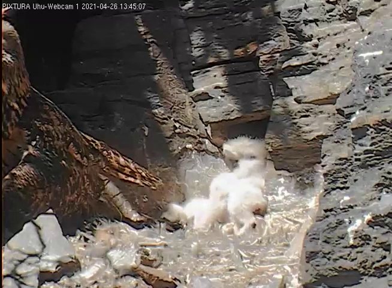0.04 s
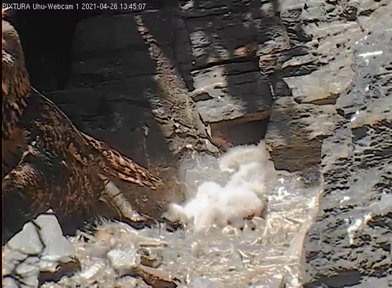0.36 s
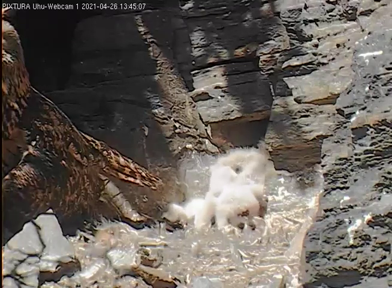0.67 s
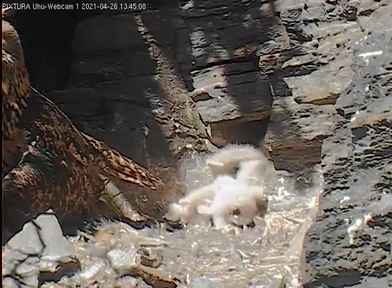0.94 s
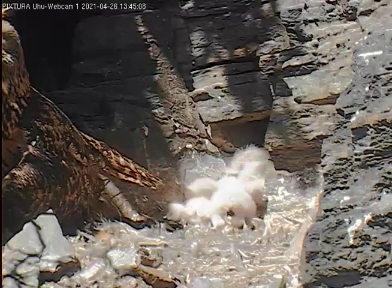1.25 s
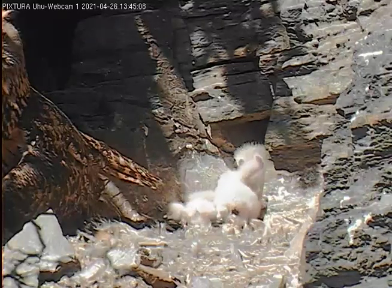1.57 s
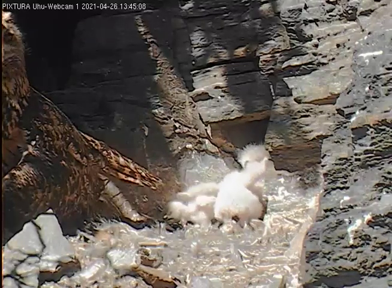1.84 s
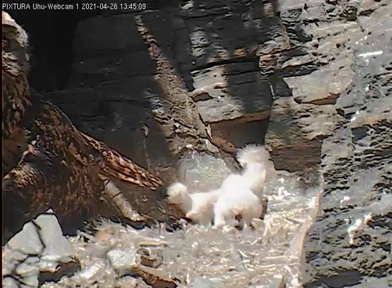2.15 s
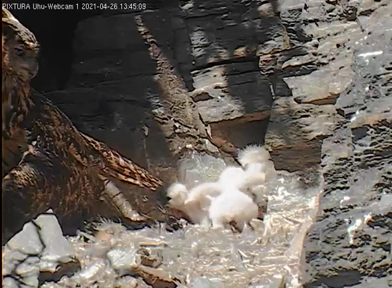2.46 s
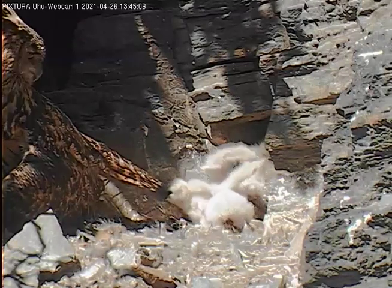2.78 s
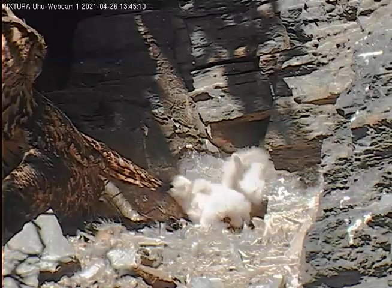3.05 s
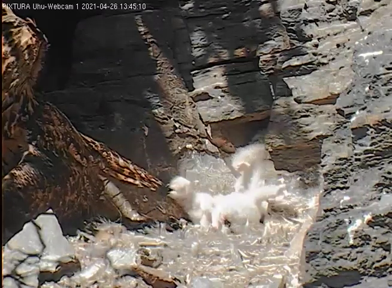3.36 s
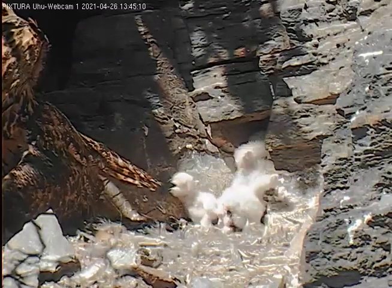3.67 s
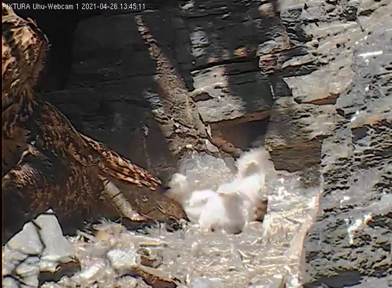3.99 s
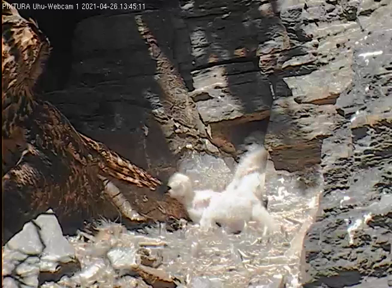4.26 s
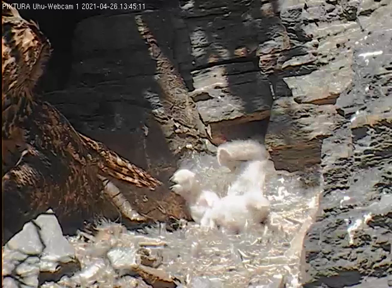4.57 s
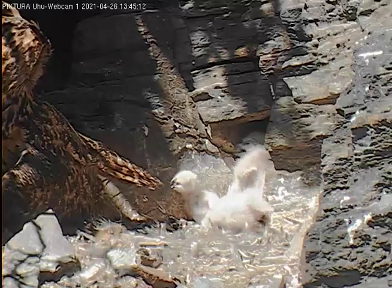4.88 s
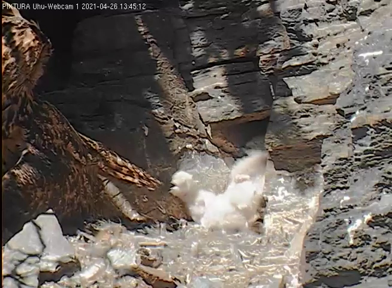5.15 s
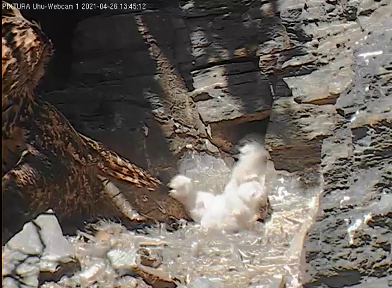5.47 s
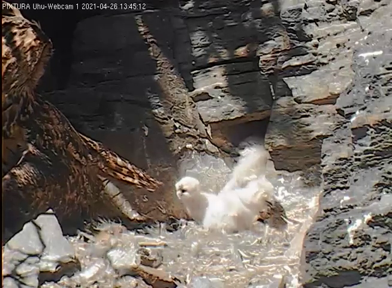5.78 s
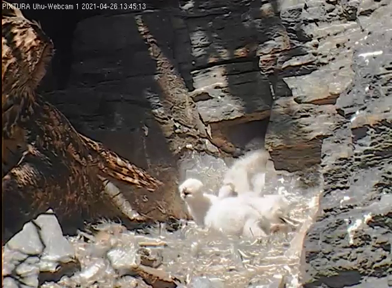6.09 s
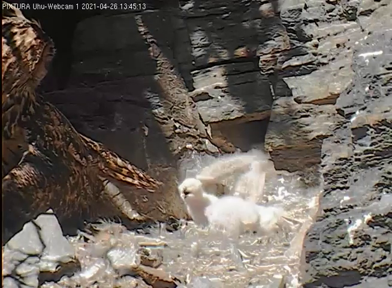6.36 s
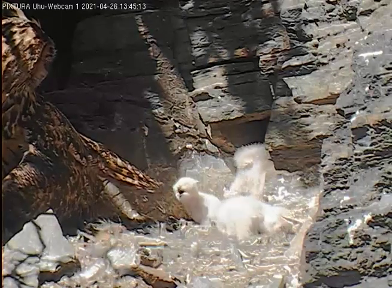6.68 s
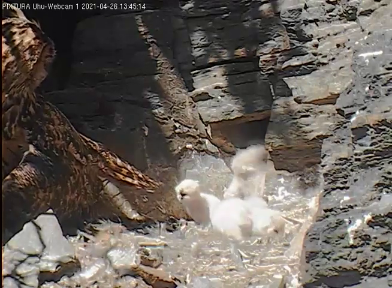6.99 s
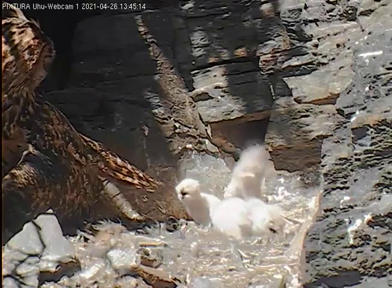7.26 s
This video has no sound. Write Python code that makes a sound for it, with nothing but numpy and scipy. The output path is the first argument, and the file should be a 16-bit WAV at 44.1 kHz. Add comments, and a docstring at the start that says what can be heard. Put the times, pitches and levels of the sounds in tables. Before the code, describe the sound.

At a nest on an outdoor rock ledge, a chick twitters thinly and dry litter ticks. After about two seconds an owl starts a quick, even run of short calls, about two a second, each a hoot, a low grunt and a hoarse cluck. The chick stops midway while the owl goes on. A small microphone also picks up a low electrical hum, far engines and a late, faint rasp.

```python
"""Owl and chicks on a rock ledge

An owl repeats a hoot, a low grunt and a hoarse cluck: pulses and puffs of air ring its throat,
with thin beak hisses between the notes. A chick twitters, nest litter ticks, the rock echoes.
Behind: electrical hum, the beating drone of far engines, outdoor air and a late, distant rasp."""
import sys
import numpy as np
from scipy import signal
from scipy.fft import next_fast_len
from scipy.io import wavfile
from scipy.ndimage import map_coordinates

SR = 44100
rng = np.random.default_rng(int(sys.argv[2]) if len(sys.argv) > 2 else 0)


def inscribe(sig):
    """Save sig as 16-bit PCM at rate SR to the path in sys.argv[1].

    A 1-D sig is mono; a 2-D sig holds one channel per row.
    Samples are clipped to [-1, 1] before scaling.
    """
    pcm = np.round(np.clip(np.atleast_2d(sig).T, -1, 1) * 32767)
    wavfile.write(sys.argv[1], SR, pcm.astype(np.int16))


N = 323304
TIME = np.arange(N) / SR


def gain_of(db):
    """Decibels to gain."""
    return 10 ** (np.asarray(db) / 20)


def unit_rms(x):
    """Scale to rms 1."""
    return x / np.sqrt(np.mean(x ** 2) + 1e-20)


def follow(rows, t):
    """Interpolate each later column over the first, at t."""
    knots, *columns = np.transpose(rows)
    return [np.interp(t, knots, column) for column in columns]


def colour(x, spectrum):
    """Minimum-phase filter through (Hz, dB) points; output rms 1."""
    size = next_fast_len(len(x) + 2048)
    bins_hz = abs(np.fft.fftfreq(size, 1 / SR))
    hz, db = np.transpose(spectrum)
    log_gain = np.log(gain_of(np.interp(np.log(bins_hz + 1), np.log(hz), db)) + 1e-5)
    response = np.exp(np.conj(signal.hilbert(log_gain)))
    return unit_rms(np.fft.ifft(np.fft.fft(x, size) * response).real[:len(x)])


def wander(count, rate_hz):
    """Smooth random curve, rms about 1."""
    knots = rng.standard_normal(4096)
    return map_coordinates(knots, [np.arange(count) * rate_hz / SR], order=2, mode="wrap")


def add(mix, start_s, sound):
    """Mix in a sound at start_s."""
    part = mix[max(round(start_s * SR), 0):][:len(sound)]
    part += sound[:len(part)]


def owl(full_db=-27):
    """Hoot, grunt, cluck. Weak calls have a shorter hoot, a later grunt and a lower, rougher cluck."""
    # Each row: hoot centre in seconds, hoot level in dB, hoot pitch in Hz, added roughness 0-1,
    # grunt level in dB, cluck level in dB, hoot-to-cluck delay in seconds.
    calls = [(2.128, -39.5, 290, .95, -44, -32.5, .161), (2.66, -34, 312, .8, -42, -31.5, .168),
             (3.2, -31, 305, .25, -45, -33, .165), (3.717, -27.5, 305, .03, -41.5, -32, .163),
             (4.182, -28, 311, .02, -35, -34.5, .174), (4.66, -27.5, 317.8, .12, -40, -31, .167),
             (5.121, -28, 316, .06, -37, -31.5, .168), (5.612, -25.5, 324, 0, -30, -31.5, .167),
             (6.095, -27, 318, .05, -33.5, -30, .172), (6.561, -26.5, 315, .02, -31.5, -30.5, .169),
             (7.043, -27, 314.2, .05, -34, -30.5, .17)]
    # Beak hisses. Each: offset from its note in seconds, relative level in dB, dB per dB of effort,
    # nominal length in seconds.
    after_hoot = (.022, -46.6, .95, .019)
    before_grunt = (-.008, -51.5, .35, .019)
    after_grunt = (.023, -48.2, .4, .021)
    before_cluck = (-.003, -59, .1, .013)
    out = np.zeros(N)
    for centre_s, db, hz, hoarse, grunt_db, cluck_db, cluck_delay_s in calls:
        effort_db = db - full_db
        weak_db = max(-effort_db, 0)
        grunt_delay_s = .0955 - .0019 * effort_db
        # Each part is (onset in seconds, sound).
        hoot_parts = [hoot(db, hz, hoarse, stretch=np.exp(-.022 * weak_db)),
                      hiss(after_hoot, effort_db)]
        grunt_parts = [pip(effort_db),
                       hiss(before_grunt, effort_db),
                       cluck(grunt_db, length_s=.033, hz=226, rough=.54),
                       hiss(after_grunt, effort_db)]
        cluck_parts = [hiss(before_cluck, effort_db),
                       cluck(cluck_db, length_s=.05, hz=347 + 1.7 * effort_db, rough=.36 + .024 * weak_db)]
        for delay_s, parts in (0, hoot_parts), (grunt_delay_s, grunt_parts), (cluck_delay_s, cluck_parts):
            for onset_s, sound in parts:
                add(out, centre_s + delay_s + onset_s, sound)
    return out


def syrinx(hz, rough, throat, jitter, shimmer):
    """Uneven pulses and a puff of air in each cycle ring the throat."""
    count, rough = len(hz), np.clip(rough, 0, 1)
    turns = np.cumsum(hz * (1 + jitter * rough * wander(count, 300))) / SR
    pulses = unit_rms(sum(np.cos(2 * np.pi * k * turns) for k in range(1, 26)))
    pulses *= 1 + shimmer * rough * wander(count, 419)
    puffs = unit_rms((.14 + np.exp(-(turns % 1) / .27)) * rng.standard_normal(count))
    return colour(np.sqrt(1 - rough ** 2) * pulses + rough * puffs, throat)


def hoot(db, hz, hoarse, stretch, leak_db=-21):
    """A note swells, holds its pitch and breaks off hoarsely; air leaks through it."""
    # Each row: unstretched time from the centre in seconds, level in dB, pitch factor, roughness 0-1.
    shape = [(-.042, -36.5, .95, 0.5), (-.03, -10, 1.03, .5), (-.025, -23.5, 0.92, .35),
             (-.017, -5, .98, 0.2), (-.011, -3, .968, 0), (0, 0, 1, 0.02), (.009, 2.5, .998, .07),
             (.014, -8.5, .99, 0.3), (.02, -13.5, 1.1, .6), (.026, -17, .95, 0.6), (.04, -37, 0.67, .8)]
    # Throat and air-leak spectra. Each row: frequency in Hz, level in dB.
    throat = [(100, -20.5), (190, 8.5), (310, 1), (450, 8), (640, 2.5), (800, -4), (950, -7), (1270, -8),
              (1550, -23), (2400, -37), (3200, -42), (4500, -45.5), (8000, -50)]
    leak_spectrum = [(400, -21), (800, -2), (1100, 4.5), (1450, 7.5), (1750, -6), (2500, 5), (3100, -15.5),
                     (3700, -3.5), (5400, -11), (6800, -14.5), (8000, -22)]
    t = np.arange(-.045 * stretch, .045 * stretch, 1 / SR)
    shape_db, bend, rough = follow(shape, t / stretch)
    voice = syrinx(hz * bend, rough + hoarse, throat, jitter=.085, shimmer=.4)
    leak = gain_of(leak_db) * colour(rng.standard_normal(len(t)), leak_spectrum)
    return t[0], gain_of(db + shape_db) * (voice + leak)


def cluck(db, length_s, hz, rough):
    """Cluck or grunt: a hoarse note leaps out of a low growl and sags in pitch as it fades."""
    # Each row: time as a share of length_s, level in dB, pitch factor.
    shape = [(-.06, -16.5, .5), (.04, -7, .55), (.2, 3, 0.97), (.45, -2.5, .88), (.72, -6, .72),
             (.92, -13, .62), (1.15, -30.5, .55)]
    # Hoarse throat spectrum. Each row: frequency in Hz, level in dB.
    throat = [(100, -30), (190, 8.5), (300, 0), (420, 6.5), (520, -2.5), (660, 4), (830, -1.5), (1030, -9),
              (1250, -12.5), (1600, -17.5), (2500, -32), (4000, -40.5), (8000, -47)]
    t = np.arange(-.15 * length_s, 1.15 * length_s, 1 / SR)
    shape_db, bend = follow(shape, t / length_s)
    return t[0], gain_of(db + shape_db) * syrinx(hz * bend, rough, throat, jitter=.13, shimmer=.55)


def pip(effort_db, lead_s=.017, length_s=.0233):
    """A small falling tone leads into the grunt."""
    hz = np.geomspace(720, 550, int(length_s * SR))
    return -lead_s, gain_of(-40 + .4 * effort_db) * whistle(hz, rough=.36)


def hiss(kind, effort_db, trim_db=1.5, grain_db=4, rise_db=2):
    """A short, slightly wet hiss from the beak, growing toward its end."""
    # Open-beak spectrum. Each row: frequency in Hz, level in dB.
    beak = [(500, -14.5), (1200, -3), (1900, -2.5), (2500, 1), (3100, -10.5), (3600, 5.5), (4000, -0.5),
            (4250, -8), (4650, -1.5), (5400, -11.5), (6600, -15), (8000, -25.5)]
    offset_s, db, effort_slope, nominal_s = kind
    count = int(nominal_s * SR * 1.1)
    air = rng.standard_normal(count)
    air *= gain_of(grain_db * wander(count, 900) + rise_db * np.linspace(-1, 1, count))
    envelope = gain_of(db + trim_db + effort_slope * effort_db) * signal.windows.tukey(count, .6)
    return offset_s - count / SR / 2, envelope * colour(air, beak)


def chick(rough=.17, upper_db=-16, upper_offset_hz=430, lean_db=2.5, swoop_hz=1450, flick_hz=1400):
    """Twitters swoop down, dwell and flick up under a weaker, hoarser voice; squeaks only fall."""
    # Each row: time of the dip in seconds, level in dB, lowest pitch in Hz, length in seconds.
    twitters = [(1.032, -58, 3050, .046), (1.138, -50.5, 3020, .059), (1.244, -55, 3040, .057),
                (1.338, -61, 3130, .051), (1.826, -56, 3050, .038), (1.939, -47.5, 3290, .049),
                (2.041, -51, 3360, .06), (2.114, -57, 3960, .041), (2.146, -45.5, 3380, .056),
                (2.248, -56, 3420, .034), (2.354, -50.5, 3440, .047), (2.458, -47.5, 3380, .045),
                (2.56, -47, 3120, .048), (2.999, -42.5, 3300, .054), (3.111, -45, 3300, .047),
                (3.217, -48.5, 3170, .037), (3.324, -51, 3370, .034), (3.429, -48, 3420, .048),
                (3.53, -52, 3080, .045)]
    # Each row: centre in seconds, level in dB, pitch in Hz, length in seconds, roughness 0-1.
    squeaks = [(1.456, -44.5, 2020, 0.035, 0.83), (1.461, -46, 923, 0.04, .3),
               (2.231, -46.5, 1820, 0.018, 0.5), (2.558, -56, 2380, 0.023, 0.75),
               (3.31, -51, 1743, 0.022, .3), (3.558, -47.5, 1980, 0.055, 0.38)]
    out = np.zeros(N)
    for (dip_s, db, hz, length_s), lean in zip(twitters, rng.standard_normal(len(twitters))):
        fall_s, rise_s = .54 * length_s, .46 * length_s
        t = np.arange(-fall_s, rise_s, 1 / SR)
        position = t / np.where(t < 0, fall_s, rise_s)
        pitch_hz = hz + np.where(t < 0, swoop_hz, flick_hz) * abs(position) ** 2.2
        lower = whistle(pitch_hz, rough)
        upper = gain_of(upper_db) * whistle(pitch_hz + upper_offset_hz, 2 * rough)
        flutter_db = wander(len(t), 211)
        add(out, dip_s - fall_s, gain_of(db + lean_db * lean * position + flutter_db) * (lower + upper))
    for centre_s, db, hz, length_s, hoarse in squeaks:
        pitch_hz = hz * (1 - .16 * np.linspace(-1, 1, int(length_s * SR)))
        add(out, centre_s - length_s / 2, gain_of(db) * whistle(pitch_hz, hoarse))
    return out


def whistle(hz, rough):
    """A thin tone whose pitch and strength flutter."""
    count = len(hz)
    turns = np.cumsum(hz * (1 + .12 * rough * wander(count, 900))) / SR
    tone = np.sin(2 * np.pi * turns) * (1 + rough * wander(count, 500))
    return unit_rms(tone) * signal.windows.tukey(count, .8)


def litter(trim_db=-1, t60_s=.032):
    """Dry bits of the nest snap under the moving chicks; thin ones sound brighter."""
    # Each row: start in seconds, relative level in dB, tilt in dB per octave.
    ticks = [(.121, -47, 8.5), (.756, -41, -6), (.8, -45, 4), (.829, -26, -0.5), (.8332, -33, 3),
             (1.666, -40.5, -6), (4.045, -41.5, 3.5), (5.944, -46, 4), (7.252, -51, 14)]
    # Snap spectrum before the tilt. Each row: frequency in Hz, level in dB.
    spectrum = [(400, -35), (600, -14.5), (800, 3), (1100, -4.5), (1500, 1), (2250, -5), (2900, -12),
                (3300, -17.5), (3950, -11.5), (4400, -22.5), (5500, -19.5), (8500, -46)]
    out, t = np.zeros(N), np.arange(3000) / SR
    for start_s, db, tilt_db in ticks:
        tilted = [(hz, band_db + tilt_db * np.log2(hz / spectrum[0][0])) for hz, band_db in spectrum]
        snap = colour(rng.standard_normal(len(t)), tilted) * gain_of(-60 * t / t60_s)
        add(out, start_s, gain_of(db + trim_db) * snap)
    return out


def ledge(x, wet_db=-13, t60_s=.042, echoes_per_s=2000, gap_s=.004):
    """The rock niche returns a short spray of echoes."""
    t = np.arange(SR // 4) / SR
    taps = rng.standard_normal(len(t)) * (rng.random(len(t)) < echoes_per_s / SR)
    taps *= (t > gap_s) * gain_of(-60 * t / t60_s)
    return x + gain_of(wet_db) * signal.fftconvolve(x, taps / np.linalg.norm(taps))[:N]


def drone(curve, orders, waver):
    """Tones at multiples of one pitch curve, each wavering in level."""
    hz, db = follow(curve, TIME)
    turns = np.cumsum(hz) / SR
    tones = np.zeros(N)
    for multiple, order_db in orders:
        tone = np.sin(2 * np.pi * (multiple * turns + rng.random()))
        tones += gain_of(order_db) * tone * (1 + waver * wander(N, 4.4))
    return np.sqrt(2) * gain_of(db) * tones


def hum():
    """Low electrical hum, drifting in pitch and level."""
    # Each row: time in seconds, pitch in Hz, relative level in dB.
    curve = [(0, 104, -45), (.75, 101.5, -51), (.98, 99.3, -34.5), (1.4, 100.4, -37), (2.7, 101.4, -39.5),
             (5.1, 101.5, -42.5), (6.05, 101.5, -41), (6.35, 100.6, -33.5), (6.9, 101.1, -35.5),
             (7.33, 101.8, -43)]
    # Each row: multiple of the pitch, level in dB.
    orders = [(1, -0.5), (1.5, -16.5), (2, -19), (21, -34.5)]
    return gain_of(-.3) * drone(curve, orders, waver=.056)


def engines():
    """Two far engines: one settles at its speed, the other sags, then gathers speed."""
    # Each row: time in seconds, pitch in Hz, relative level in dB.
    settling = [(0, 77.5, -50), (.4, 78.7, -45), (1.1, 82.8, -42), (2, 85, -49), (4.8, 85.3, -50.5),
                (5.6, 85.5, -46), (6.5, 86.2, -53), (7.33, 86.3, -44)]
    gathering = [(0, 61.6, -62), (2.1, 61, -57), (2.5, 60, -47), (3, 58.3, -66), (4.1, 56, -62),
                 (4.6, 59, -43), (5, 63, -58), (5.6, 69, -48.5), (7.33, 72.3, -44.5)]
    # Each row: multiple of the pitch, level in dB.
    orders = [(.5, -8), (1, 3), (1.5, -13), (2, -7.5)]
    return drone(settling, orders, waver=.1) + gain_of(-.5) * drone(gathering, [(1, 0)], waver=.18)


def outdoors(air_rise_db_per_s=.33, rumble_fall_db_per_s=.15):
    """Air slowly grows and a far rumble slowly recedes; two faint whines persist."""
    # Two noise spectra and the whine tones. Each row: frequency in Hz, level in dB.
    air_spectrum = [(120, -22.5), (200, 3), (234, -8), (297, -2.5), (342, -5.5), (477, -8), (516, -15.5),
                    (595, -9.5), (731, -16.5), (971, -14), (2800, -26.5), (3440, -31.5), (4570, -34.5),
                    (7340, -36.5), (8730, -66), (11300, -93), (19200, -120)]
    rumble_spectrum = [(20, -37), (32, -27.5), (42, 2.5), (52, 14.5), (64, 12.5), (80, 3.5), (115, 4.5),
                       (165, -2), (220, -12.5), (320, -38)]
    whine_tones = [(613, -66), (2126, -74)]
    air = colour(rng.standard_normal(N), air_spectrum)
    air *= gain_of(-48.3 + air_rise_db_per_s * TIME + .57 * wander(N, 16))
    rumble = colour(rng.standard_normal(N), rumble_spectrum)
    rumble *= gain_of(-45.8 - rumble_fall_db_per_s * TIME + .5 * wander(N, 1.5))
    whines = sum(gain_of(db) * unit_rms(np.sin(2 * np.pi * hz * TIME) * (1 + .5 * wander(N, 9.8)))
                 for hz, db in whine_tones)
    return air + rumble + whines


def rasp(start_s=6.0, attack_s=.5, hold_s=.45, release_s=.8, db=-50, pulse_hz=15, pulse_db=-5.5):
    """A distant rasp swells, holds and fades: a throbbing hiss with quick, uneven pulses on top."""
    # Each row: frequency in Hz, level in dB.
    hiss_spectrum = [(700, -12.5), (1150, 1.5), (1400, -2.5), (1630, 1), (1780, -0.5), (1900, 5.5),
                     (2150, -10.5), (2450, -0.5), (2750, -12), (3300, -12.5), (4500, -29), (8000, -34)]
    pulse_spectrum = [(1500, -37), (1800, -15.5), (1900, 1), (2020, -17), (2250, -12.5), (2450, 1.5),
                      (2650, -8.5), (3100, -19), (4000, -45)]
    throb = colour(rng.standard_normal(N), hiss_spectrum) * gain_of(1.2 * wander(N, 28))
    turns = np.cumsum(pulse_hz * (1 + .2 * wander(N, 10))) / SR
    pulses = unit_rms(np.sin(np.pi * turns) ** 4) * colour(rng.standard_normal(N), pulse_spectrum)
    envelope = np.interp(TIME, np.cumsum([start_s, attack_s, hold_s, release_s]), [0, 1, 1, 0])
    return gain_of(db) * envelope * (throb + gain_of(pulse_db) * pulses)


def scene():
    """The birds in their niche, over the background; mono."""
    nest = ledge(owl() + chick() + litter())
    return (nest + hum() + engines() + outdoors() + rasp())[None]


def record(dry):
    """The narrow band of a small outdoor microphone."""
    cutoff_hz = 8350
    lowpass = signal.firwin(121, cutoff_hz, window=("kaiser", 8), fs=SR)
    return signal.oaconvolve(dry, lowpass[None], "same")


dry = scene()
out = record(dry)
inscribe(out)
```